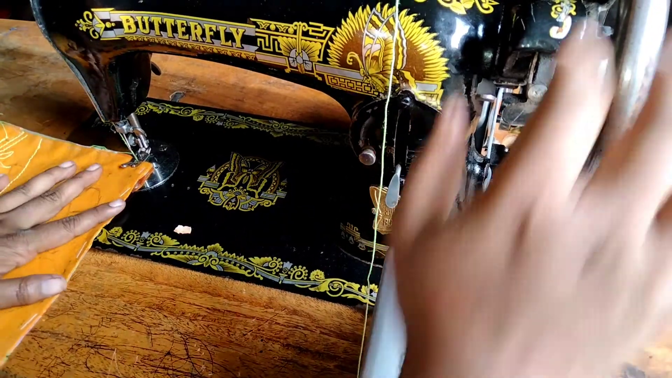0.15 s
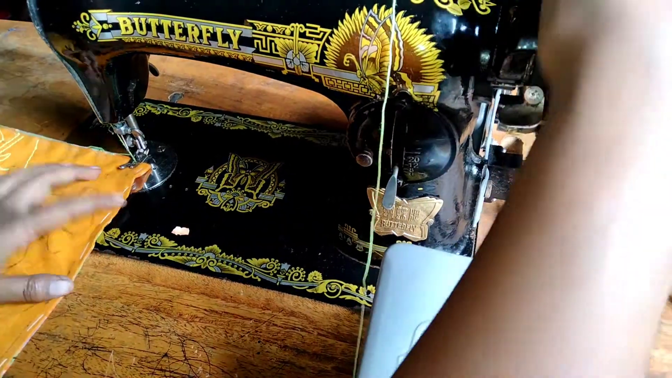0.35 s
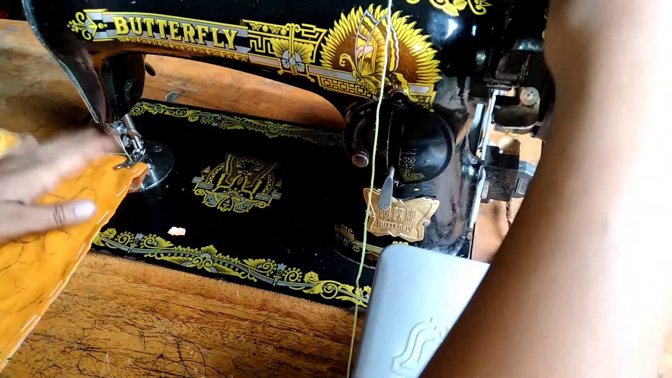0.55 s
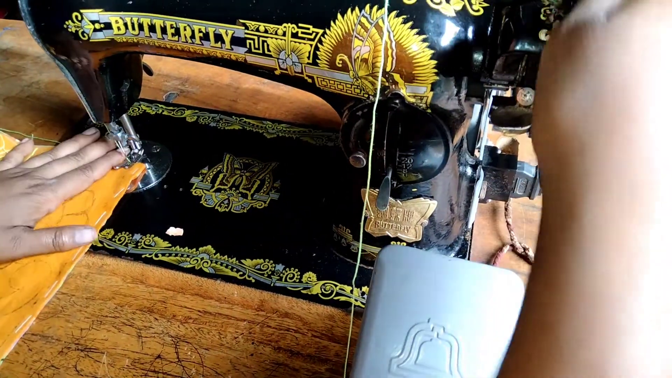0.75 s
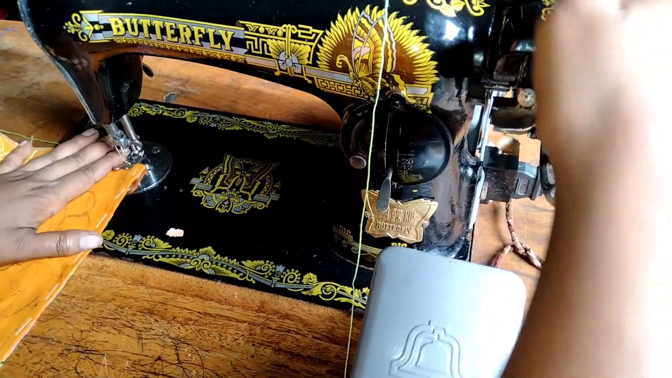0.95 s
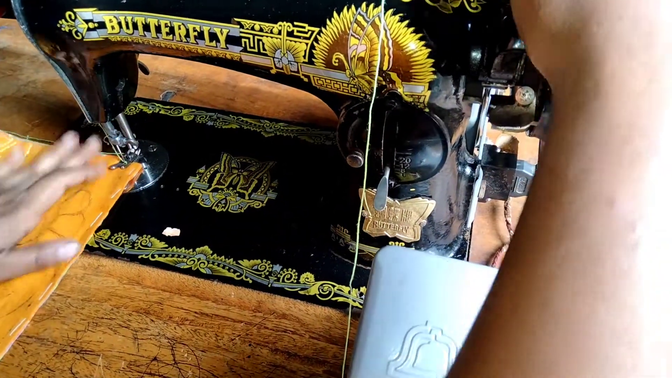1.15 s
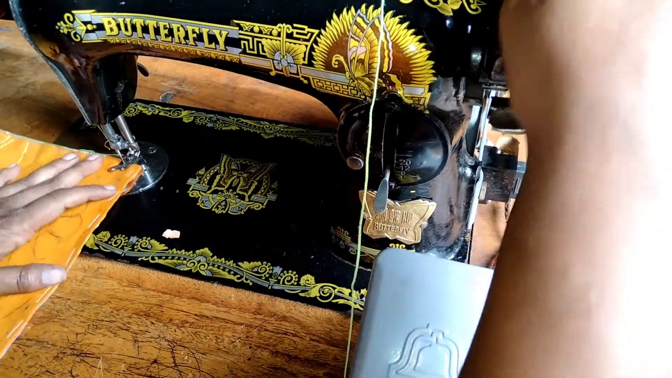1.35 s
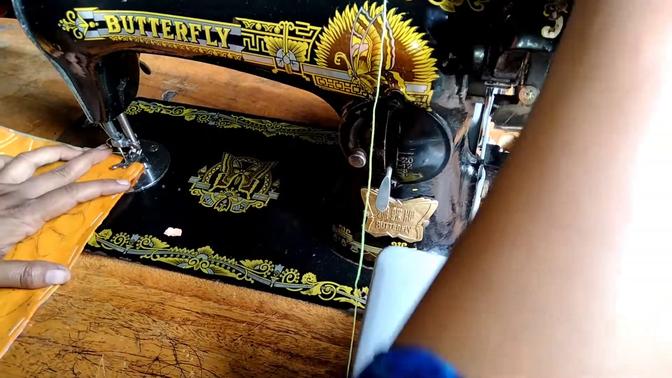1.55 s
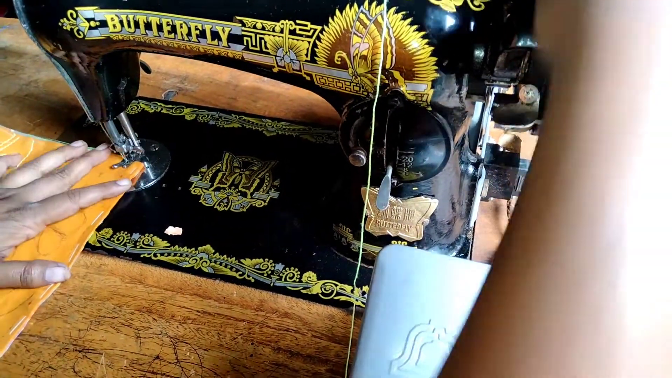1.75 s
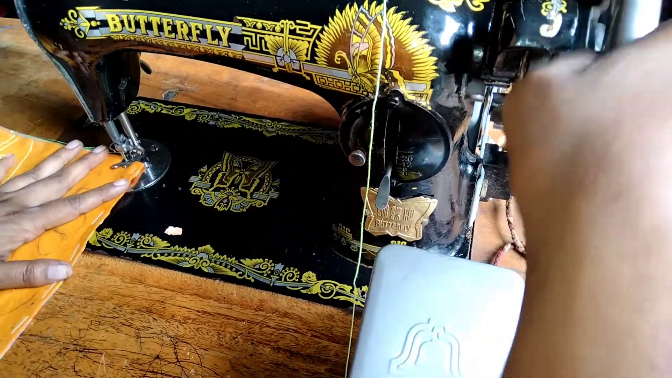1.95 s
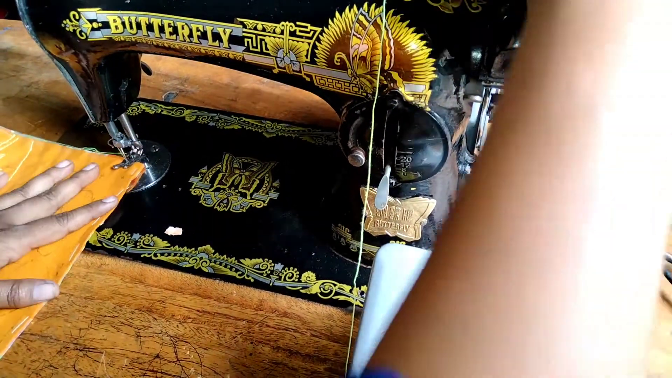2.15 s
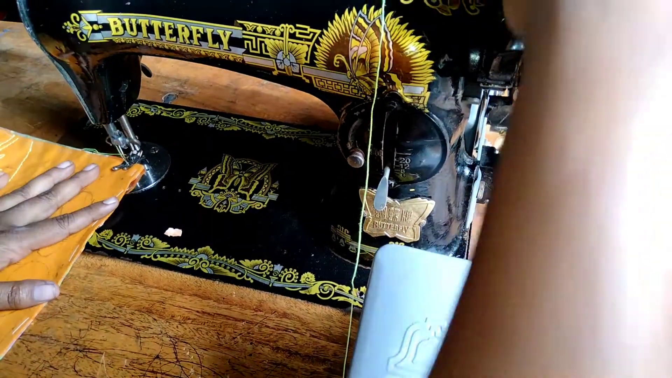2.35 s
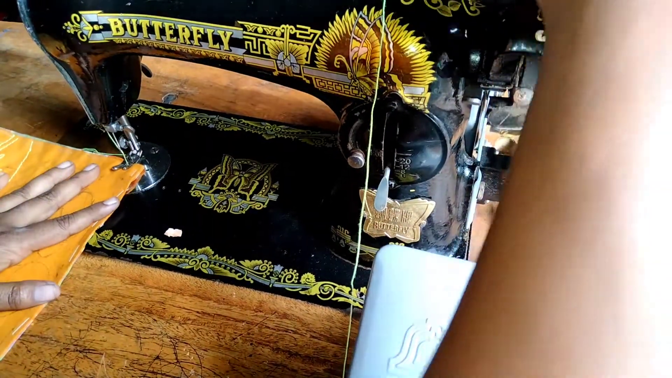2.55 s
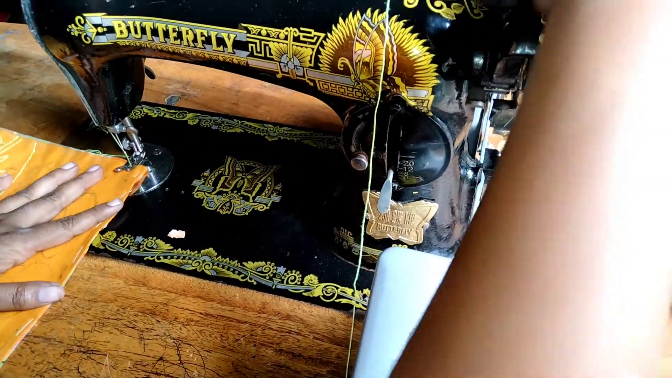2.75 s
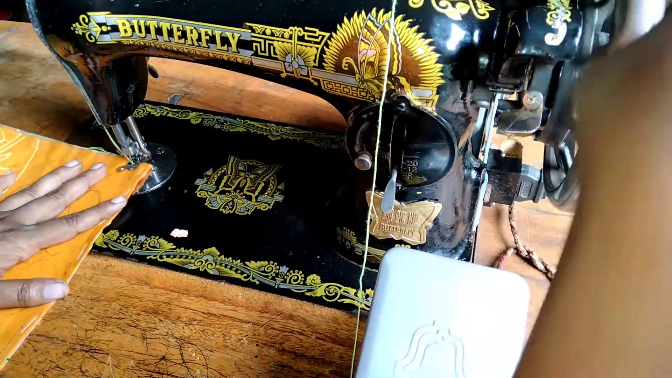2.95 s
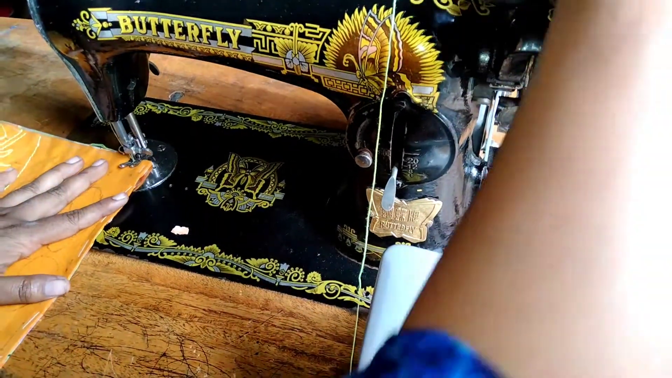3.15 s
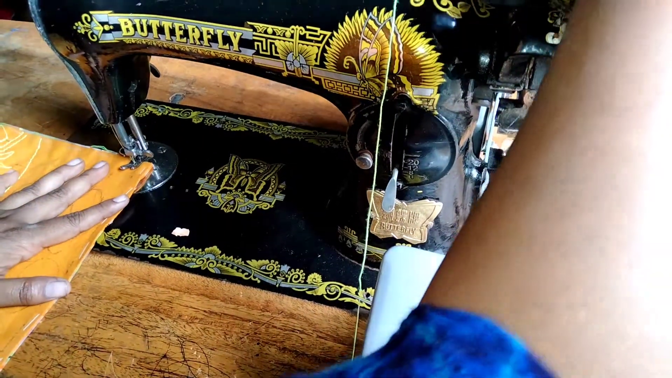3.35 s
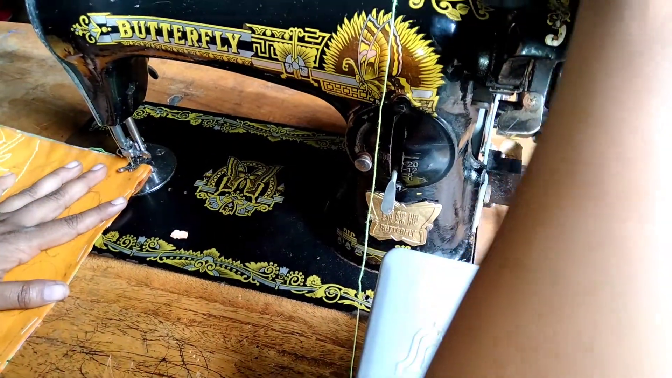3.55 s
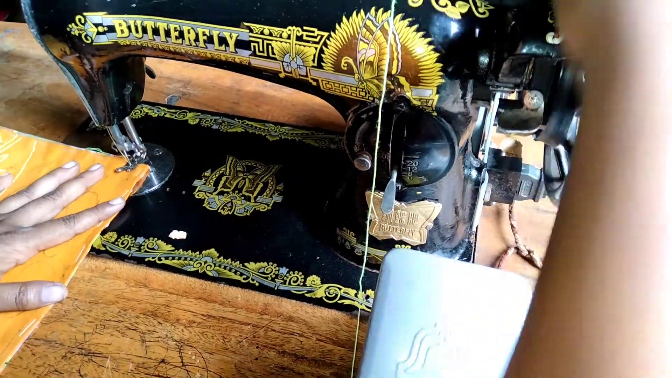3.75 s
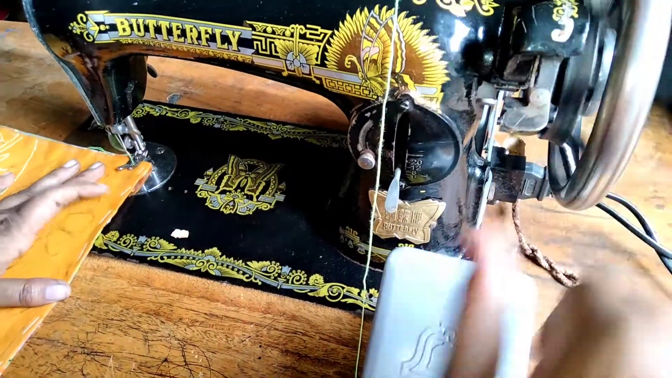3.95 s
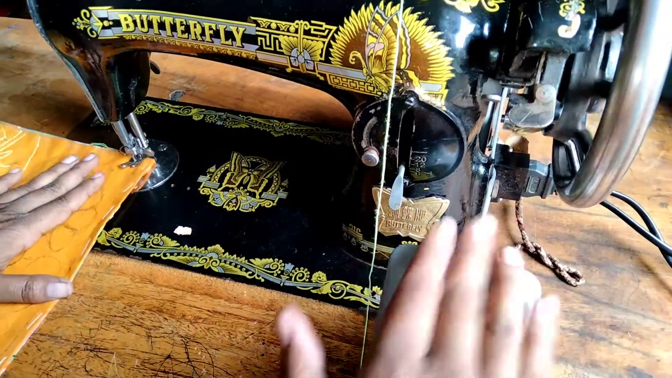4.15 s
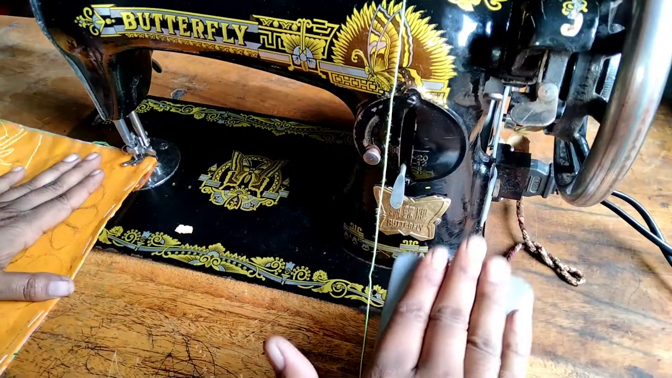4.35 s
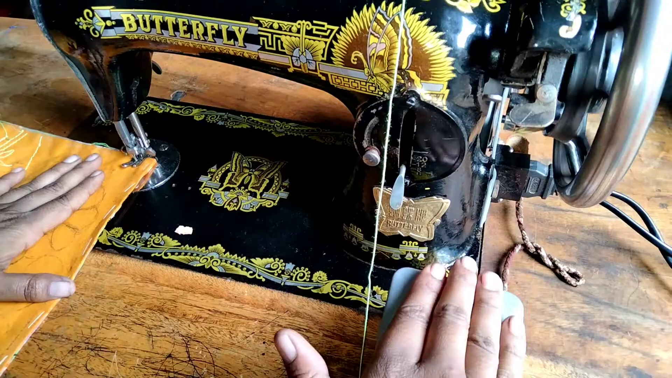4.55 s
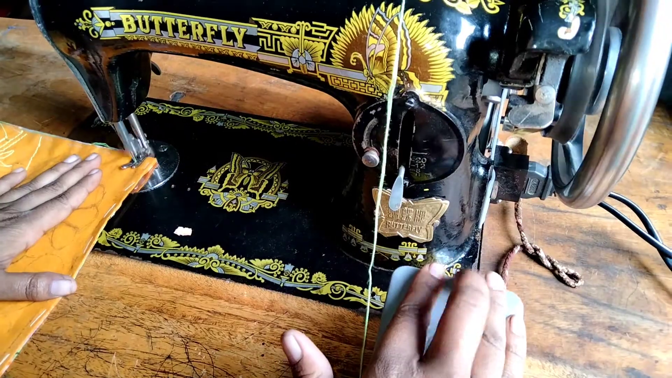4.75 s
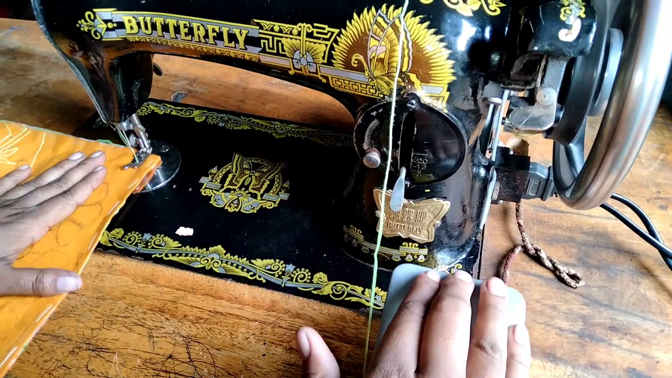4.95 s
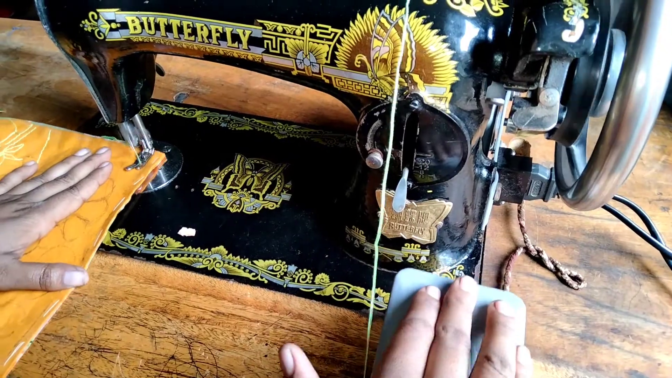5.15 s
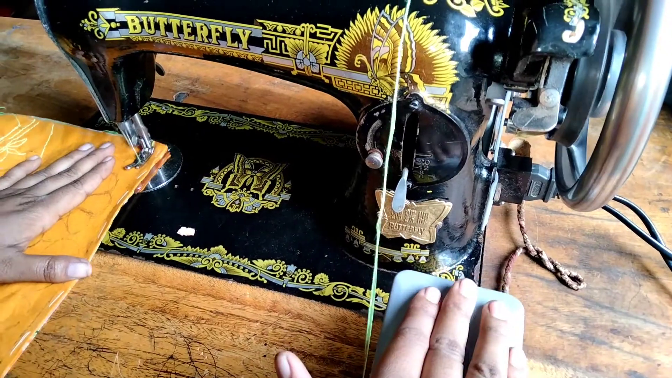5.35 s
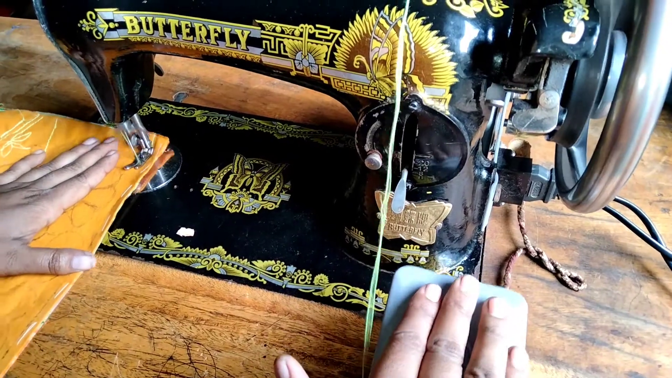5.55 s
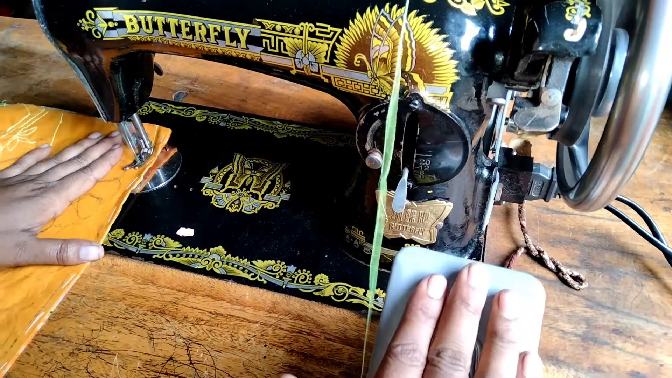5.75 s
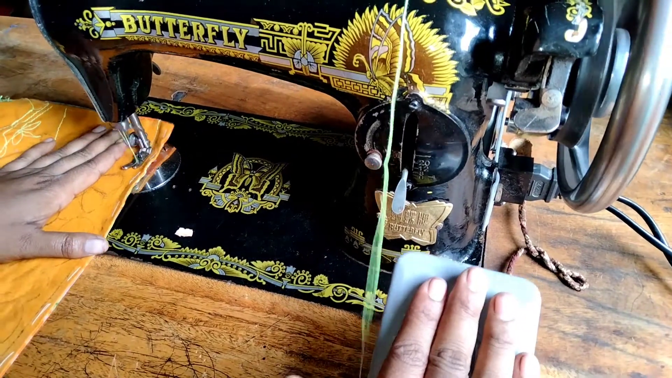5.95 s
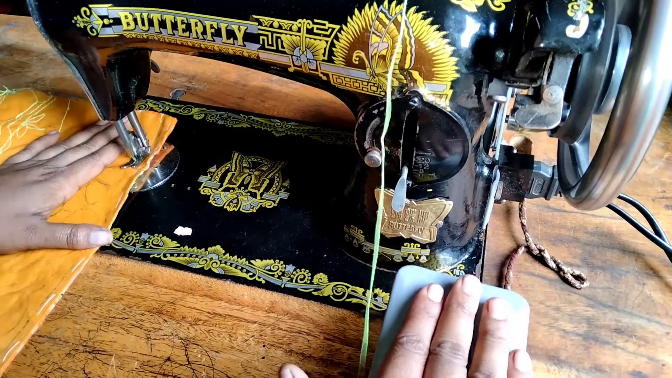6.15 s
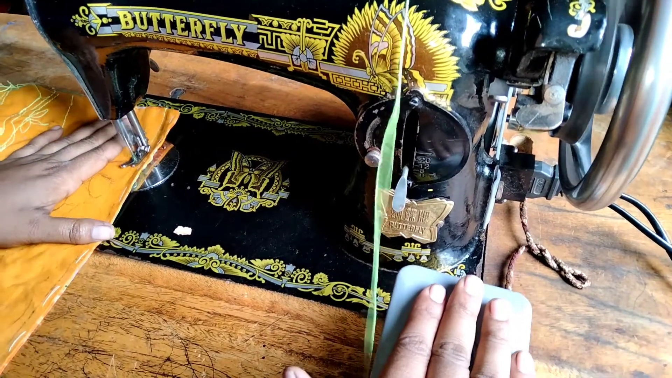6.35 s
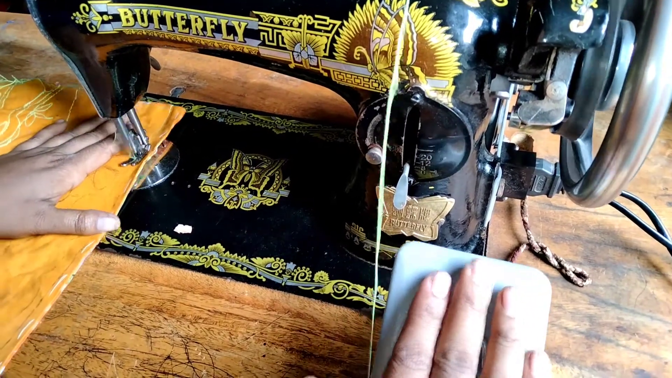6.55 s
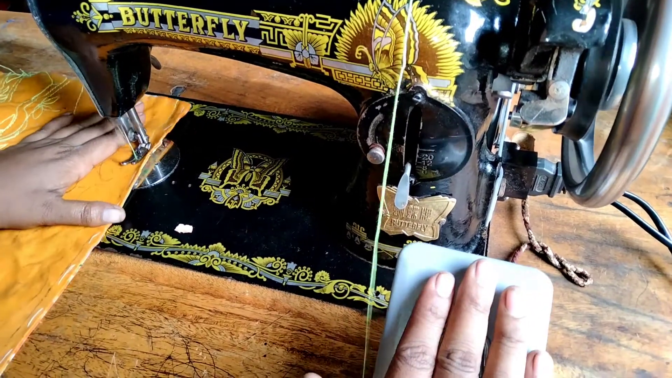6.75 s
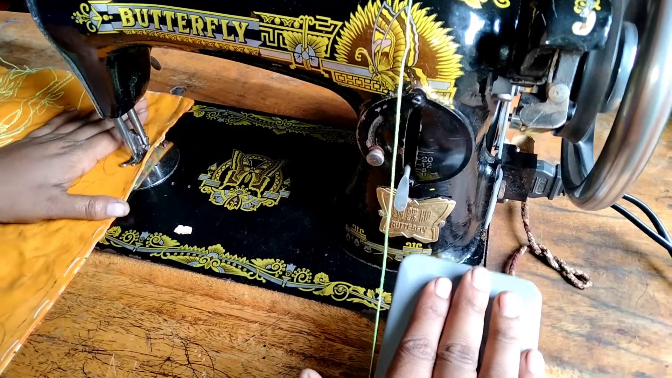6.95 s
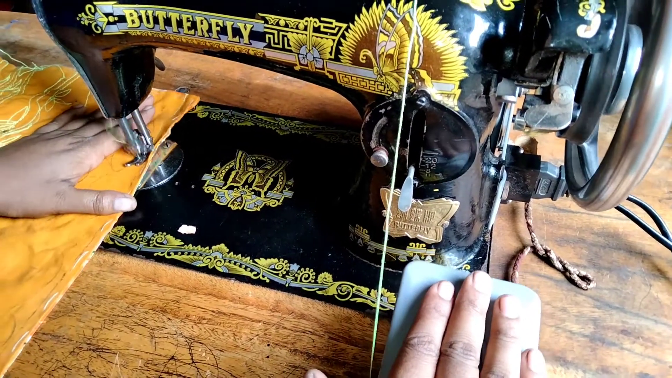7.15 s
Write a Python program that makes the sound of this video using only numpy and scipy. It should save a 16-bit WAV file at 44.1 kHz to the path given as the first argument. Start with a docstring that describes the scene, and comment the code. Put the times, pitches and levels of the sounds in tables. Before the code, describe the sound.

Soft handling near a sewing machine, one iron clank and dry clicks, then a small motor whirs up and loud, rapid stitching rattles on.

```python
"""Room hush and soft sliding cloth, then small knocks, rubs and faint squeaks under the hands, heard very close.
They turn the wheel of a cast-iron sewing machine on a wooden table, clank it on its stop and click a plastic pedal.
A small add-on motor whirs up, the belt takes hold, and the same round of strokes clatters for every stitch,
faster and slower. Hiss and tone stacks make cloth and motor; noise bursts and decaying modes make the blows."""
import sys
import numpy as np
from scipy import signal
from scipy.fft import rfft, irfft
from scipy.io import wavfile
from scipy.ndimage import uniform_filter1d

SR = 44100
rng = np.random.default_rng(int(sys.argv[2]) if len(sys.argv) > 2 else 0)


def pcm_store(signal):
    """Save signal as 16-bit PCM."""
    levels = np.round(np.clip(np.atleast_2d(signal), -1, 1) * 32767)
    wavfile.write(sys.argv[1], SR, levels.astype(np.int16).T)


N = 317520


def undb(db):
    """Decibels to gain."""
    return 10 ** (np.asarray(db) / 20)


def unit(x):
    """Scale to rms 1."""
    return x / np.sqrt(np.mean(x ** 2) + 1e-30)


def curves(table):
    """The columns of a table, joined by straight lines in time."""
    s, *columns = np.transpose(table)
    return [np.interp(np.arange(N) / SR, s, c) for c in columns]


def add(out, s, x):
    """Mix a sound in at a time."""
    i = max(int(s * SR), 0)
    out[i:i + len(x)] += x[:max(N - i, 0)]


def band(x, lo_hz, hi_hz, order=2):
    """Band-pass."""
    edges = [max(lo_hz, 10), min(hi_hz, SR / 2 - 100)]
    return signal.sosfilt(signal.butter(order, edges, "band", fs=SR, output="sos"), x + 1e-18)


def colour(x, points, resonances=(), size=8192):
    """Causal minimum-phase filter: a broad spectrum lifted at each resonance."""
    hz = np.arange(size // 2 + 1) * SR / size
    at, db = np.transpose(points)
    db = np.interp(np.log(hz + 1), np.log(at), db)
    for centre, width, lift in resonances:
        db = db + lift / (1 + (2 * (hz - centre) / width) ** 2)
    # folding the cepstrum makes the filter causal
    cepstrum = irfft(np.log(undb(db)))
    cepstrum[1:size // 2] *= 2
    cepstrum[size // 2 + 1:] = 0
    impulse = irfft(np.exp(rfft(cepstrum)))
    return signal.fftconvolve(x, impulse)[:len(x)]


def walk(rate):
    """Slow random drift of rms 1, with about this many new values per second."""
    k = max(int(SR / rate), 1)
    steps = np.repeat(rng.standard_normal(N // k + 1), k)
    return unit(uniform_filter1d(uniform_filter1d(steps, k), k)[:N])


def grit(spread_db, size):
    """Dense tiny contacts of very unequal strength."""
    return unit(rng.standard_normal(size) * undb(spread_db * rng.standard_normal(size)))


def mean_level(x, size=7000):
    """Rms over a couple of stitches."""
    power = uniform_filter1d(uniform_filter1d(x ** 2, size), size)
    return np.sqrt(np.abs(power) + 1e-5 * np.mean(x ** 2))


def shifting(x, points, resonances, shift=0.012, rate=14):
    """A colour whose resonances shift a little as the parts move."""
    def moved(factor):
        return colour(x, points, [(hz * factor, width, lift) for hz, width, lift in resonances])
    lower, upper = moved(1 - shift), moved(1 + shift)
    position = .5 + .5 * np.tanh(2 * walk(rate))
    return (1 - position) * lower + position * upper


ROOM_DB = -65  # rms
# colour of the quiet room: (frequency [Hz], relative level [dB])
ROOM_COLOUR = [(20, 1.5), (45, -2), (100, -8.5), (200, -12.5), (300, -16.5), (800, -26.5), (2000, -34),
               (6000, -43.5), (15500, -60)]


def room_hush():
    """Steady noise, heavy in the bass, stands for the air of the room."""
    return undb(ROOM_DB) * unit(colour(rng.standard_normal(N), ROOM_COLOUR))


RESTING_DB = -72  # cloth under the resting hand, relative level like the slides
# separate slides of hand and cloth: (start [s], length [s], relative level [dB])
SLIDES = [(0.145, 0.38, -66), (0.458, 0.13, -68.5), (1.11, 0.39, -68.5), (1.38, 0.39, -67.5),
          (1.84, 0.35, -66), (2.38, 0.37, -66), (2.783, 0.46, -57), (3.064, 0.49, -64), (3.832, 0.54, -57)]
# colour of the rustle, heard with a bright lift near 9 kHz: (frequency [Hz], relative level [dB])
RUSTLE_COLOUR = [(60, -39), (250, -1), (600, -11), (2000, -16.5), (4000, -15), (5500, -18), (7200, -11.5),
                 (9000, -0.5), (11000, -11.5), (15500, -14.5)]


def rustle(gain_db=1.0):
    """Cloth and skin slide over the bed of the machine; each slide swells and fades."""
    power = np.full(N, undb(RESTING_DB) ** 2)
    for s, length, db in SLIDES:
        add(power, s, (undb(db) * np.hanning(int(length * SR))) ** 2)
    fibres = unit(colour(grit(3, N), RUSTLE_COLOUR))
    return np.sqrt(power) * undb(gain_db) * fibres


# the hand rubs on wheel or pedal as it takes a new grip:
# (start [s], length [s], relative level [dB], note [Hz], width [Hz])
SCRAPES = [(0.172, 0.09, -60.5, 1100, 2200), (.795, 0.058, -64, 1700, 700), (1.372, 0.11, -59.5, 940, 1500),
           (2.595, 0.049, -57, 925, 300), (2.694, 0.09, -57, 1010, 900), (2.918, 0.11, -54.5, 1200, 1500),
           (3.023, 0.066, -58, 380, 160), (4.119, .17, -56.5, 340, 200)]


def scrapes(attack_share=0.28, grit_db=6, spot_db=9, skirt_db=-6):
    """The hand drags: a catching rub that swells, then fades, around one note of the rubbed part."""
    out = np.zeros(N)
    for s, length, db, hz, width_hz in SCRAPES:
        size = int(length * SR)
        swell = np.interp(np.linspace(0, 1, size), [0, attack_share, 1], [0, 1, 0]) ** 2
        skirts = [(100, skirt_db), (hz, 0), (4000, skirt_db), (7000, -30)]
        rub = colour(grit(grit_db, size), skirts, [(hz, width_hz, spot_db)])
        add(out, s, undb(db) * swell * unit(rub))
    return out


# thin squeaks under the hand, and one shrill high partial of the motor's whine at speed:
# (start [s], length [s], pitch [Hz], relative level [dB])
THIN_TONES = [(0.184, 0.11, 1460, -72), (0.23, 0.14, 1110, -77), (0.851, 0.14, 1404, -71),
              (1.384, 0.2, 2040, -71), (1.402, 0.4, 1710, -79), (1.476, 0.37, 794, -74),
              (1.78, .13, 1500, -77), (1.782, 0.16, 882, -73), (2.991, 0.053, 3410, -52.5),
              (3.822, 0.095, 1650, -73), (5.327, 0.44, 8080, -23.5)]


def thin_tones(gain_db=-2, waver=0.01, flutter_db=4):
    """Squeaks and the shrill whine partial are short, slightly unsteady sines that swell and fade."""
    out, unsteady = np.zeros(N), 1 + waver * walk(60)
    for s, length, hz, db in THIN_TONES:
        pitch = hz * unsteady[int(s * SR):int((s + length) * SR)]
        tone = np.sin(2 * np.pi * np.cumsum(pitch) / SR)
        add(out, s, undb(db + gain_db) * np.hanning(len(pitch)) * tone)
    return out * undb(flutter_db * walk(40))


# the cloth catches as it is lined up: (time [s], peak level [dB], note [Hz])
CLOTH_TICKS = [(.526, -54, 9110), (.5377, -47, 8800), (.554, -50, 8340), (.618, -54, 9910)]


def cloth_ticks(decay_s=0.0022, width_hz=1200, lift_db=10):
    """Tiny bright ticks as the cloth catches and slips free."""
    out, age = np.zeros(N), np.arange(SR // 20) / SR
    bright = [(500, -40), (9000, 10), (15500, -3)]
    for s, db, hz in CLOTH_TICKS:
        burst = rng.standard_normal(len(age)) * np.exp(-age / decay_s)
        tick = colour(burst, bright, [(hz, width_hz, lift_db)])
        add(out, s, undb(db) * tick / np.max(np.abs(tick)))
    return out


# broad colour of all blows and of the running machine, heard with a bright lift near 9 kHz: (frequency [Hz],
# relative level [dB])
BODY = [(20, -17), (40, -6.5), (100, -8), (300, -7), (650, -13), (800, -13.5), (1500, -12), (2300, -16.5),
        (4200, -15.5), (5800, -15.5), (7000, -8), (8800, 1), (11000, -8.5), (15500, -17.5)]


def knocks(blows, resonances, thud_ring=1.61, tick_ring=0.74):
    """Each blow thuds, clacks and ticks in the colour of body and spot; modes of the struck parts ring on."""
    age = np.arange(SR) / SR
    out = np.zeros(N)
    bands_hz = ((135, 1190), (1200, 6130), (6500, 15000))  # thud, clack, tick
    contacts = [band(grit(4, 2 * SR), lo, hi, order=4) for lo, hi in bands_hz]
    contacts = [c / np.std(colour(c, BODY, resonances)) for c in contacts]
    for s, contact_s, t60, thud_clack_tick, spot, modes in blows:
        rise = np.minimum(age / max(contact_s, 1e-4), 1)
        after = np.maximum(age - contact_s, 0)
        i = rng.integers(SR)
        burst = np.zeros(SR)
        for c, db, stretch in zip(contacts, thud_clack_tick, (thud_ring, 1, tick_ring)):
            burst += undb(db) * c[i:i + SR] * np.exp(-np.log(1000) * after / (t60 * stretch))
        add(out, s, colour(rise * burst, BODY, list(resonances) + spot))
        for hz, db, ring_s in modes:
            tone = np.sin(2 * np.pi * (hz * age + rng.random()))
            add(out, s, undb(db) * rise * np.exp(-np.log(1000) * after / ring_s) * tone)
    return out


def struck(modes, db):
    """A table of modes at the strength of one blow."""
    return [(hz, db + mode_db, t60) for hz, mode_db, t60 in modes]


PEDAL_S = 4.0  # from here on the hand is on the plastic pedal, no longer on the wheel
KNOCK_T60_S, CONTACT_SHARE = 0.15, 0.013  # ring of a middling knock; part of the ring time the contact lasts
# hard knocks die sooner, strong ones ring longer
MIDDLING_DB, HARDNESS_DB_PER_HALVING, FORCE_DB_PER_DOUBLING = -52, 13, 36
NOTE_CYCLES = 98  # the struck part dies away by 60 dB in this many cycles, so low notes hang on
# the hand knocks against wheel and frame, then lands on the pedal: (time [s], relative level [dB],
# hardness as tick over level [dB], note of the struck part [Hz], note over level [dB])
HAND_KNOCKS = [(0.755, -69.5, 3, 977, 5), (0.948, -62.5, 11, 1400, -7), (0.956, -59, 9, 4060, 7),
               (1.325, -61.5, 4, 4140, 0), (1.386, -59.5, 0.5, 560, -10), (1.412, -61, -9, 290, 1),
               (1.767, -56.5, -2, 582, 2), (1.955, -59.5, 16.5, 3840, -3), (2.081, -65.5, 0, 560, -9),
               (2.425, -55.5, 0.5, 343, 5.5), (2.426, -59, 7, 4060, 9), (2.594, -62, -2, 1820, 11),
               (2.602, -64.5, 4, 592, 11), (2.706, -60, 5, 1420, -2), (2.722, -54, 1.5, 1536, 3),
               (2.735, -60.5, -2, 226.5, 5.5), (2.839, -54.5, -0.5, 575, 1), (2.908, -54.5, 13.5, 770, 0),
               (2.937, -52.5, 1, 830, 5), (2.945, -53.5, 1, 1260, 1), (2.968, -51, -1, 1860, -1),
               (2.981, -59, -2, 597, 10), (3.021, -52, 3.5, 385, 3), (3.044, -60.5, 10, 353.6, 18),
               (3.192, -63, 4.5, 312, -5), (4.02, -56, -3, 563, 4.5), (4.041, -65, 18, 3420, -6),
               (4.055, -56, 14, 3470, 0), (4.082, -60, 16, 3500, 11), (4.098, -48.5, 14.5, 3350, -5),
               (4.117, -50.5, -1, 560, -1), (4.172, -52, 1, 345, 3.5), (4.208, -64.5, 15, 337, 14)]
# long rings of wheel and frame after a knock: (frequency [Hz], relative level [dB], t60 [s])
FRAME = [(635, 6, .24), (894, -6.5, .6), (2105, -22, 1.3), (2122, -4, .24), (2643, -5, .2), (3348, -9, .22),
         (3741, -2, .15), (4753, 5, .21), (7138, -2, .19), (7935, -12, .26)]
# the woody body of a knock on the table: (frequency [Hz], width [Hz], lift [dB])
WOOD = [(227, 18, 5.5), (278, 33, -3), (600, 140, 7.5), (874, 140, 5.5), (1250, 63, 1), (1810, 230, 8),
        (3600, 3100, 5.5)]


def hand_knocks(clack_db=-2, lean=0.24, frame_db=-11, soft_hz=1800, dull=2.4, spot_width=0.16, spot_db=5):
    """A harder knock is shorter and leans from thud to clack; until the pedal it also rings the frame's lows."""
    blows = []
    for s, db, hardness, note_hz, note_db in HAND_KNOCKS:
        doublings = (db - MIDDLING_DB) / FORCE_DB_PER_DOUBLING - hardness / HARDNESS_DB_PER_HALVING
        t60 = KNOCK_T60_S * 2 ** doublings
        thud, clack = db - lean * hardness, db + clack_db + lean * hardness
        modes = [(note_hz, db + note_db, NOTE_CYCLES / note_hz)]
        if s < PEDAL_S:
            for hz, mode_db, ring_s in struck(FRAME, thud + frame_db):
                modes.append((hz, mode_db - 20 * np.log10(1 + (hz / soft_hz) ** 2), ring_s))
        # a soft hand damps the treble
        spot = [(note_hz, spot_width * note_hz, spot_db), (4500, 3500, dull * min(hardness, 0))]
        blows.append((s, CONTACT_SHARE * t60, t60, (thud, clack, db + hardness), spot, modes))
    return knocks(blows, WOOD)


# the wheel touches its stop, clanks heavily and rebounds:
# (time [s], relative level [dB], hardness as tick over level [dB], t60 of the clack [s])
CLANKS = [(3.356, -52.5, 7, 0.058), (3.365, -36.5, -0.5, 0.2), (3.388, -53, -4, 0.066),
          (3.418, -56, -4, 0.084)]


def wheel_clanks(contact_share=0.022, thud_db=-4.5, frame_db=-11):
    """The heavy wheel meets its stop with a slow contact and sets the frame ringing."""
    blows = []
    for s, db, hardness, t60 in CLANKS:
        levels = (db + thud_db, db, db + hardness)
        blows.append((s, contact_share * t60, t60, levels, [], struck(FRAME, db + frame_db)))
    return knocks(blows, WOOD)


# the pedal clicks as it is pressed down: (time [s], relative level [dB],
# hardness as tick over level [dB], note of the spot that snaps [Hz], contact [ms])
PEDAL_CLICKS = [(4.297, -49, 2, 3300, 2.5), (4.316, -39, -14, 1540, 1.7), (4.32, -46.5, -2, 3360, 1.2),
                (4.373, -37.5, -14, 1160, 0.84), (4.376, -29, -3.5, 3400, 0.91), (4.41, -43, -9, 1600, 2.4),
                (4.451, -45.5, -1, 4940, 1.3), (4.465, -56, -3, 5000, 1), (4.476, -38.5, -12, 1080, 1.8),
                (4.48, -37, 1.5, 3470, 0.57), (4.488, -41, 3, 5470, 2), (4.5237, -28.5, 1.5, 4330, 0.3),
                (4.571, -42.5, 3.5, 5930, 1.8)]
# the plastic shell of the pedal: (frequency [Hz], width [Hz], lift [dB])
PEDAL_SHELL = [(1670, 820, 5.5), (3800, 670, 6.5), (5000, 2000, 4.5), (6840, 300, 7)]


def pedal_clicks(t60=0.051, thud_db=-13, clack_db=-6.0, spot_width=0.44, spot_db=11):
    """The light plastic pedal gives dry clicks with little thud, each coloured by the spot that snaps."""
    blows = []
    for s, db, hardness, hz, contact_ms in PEDAL_CLICKS:
        levels = (db + thud_db, db + clack_db, db + hardness)
        blows.append((s, contact_ms / 1000, t60, levels, [(hz, spot_width * hz, spot_db)], []))
    return knocks(blows, PEDAL_SHELL)


FULL_SPEED = 15  # stitches per second at which the clatter levels and the loaded whine hold
# the motor is switched on and runs up freely, until the belt grips and ties it to the shaft
MOTOR_ON_S, RUN_UP_S, FREE_HZ = 4.55, .1, 1265
GRIP_S, GRIPPED_S = 4.93, 5.5
LOADED_HZ, BELT_EXPONENT = 1003, .45  # whine at full speed; the slipping belt varies it less than the shaft
# main shaft, also drives the mechanism: (time [s], speed [stitches/s])
SPEED = [(4.8, 5.996), (5.03, 9.079), (5.2, 8.738), (5.71, 16.975), (6.02, 13.46), (6.21, 11.876),
         (6.59, 16.875), (7.0, 12.548), (7.2, 10.832)]


def motor_pitch():
    """The motor runs up freely, then the belt grips and drags it down to the pace of the shaft."""
    t = np.arange(N) / SR
    speed, = curves(SPEED)
    free_hz = FREE_HZ * (1 - np.exp(-np.maximum(t - MOTOR_ON_S, 0) / RUN_UP_S))
    loaded_hz = LOADED_HZ * (speed / FULL_SPEED) ** BELT_EXPONENT
    grip = np.interp(t, [GRIP_S, GRIPPED_S], [0, 1])
    return (1 - grip) * free_hz + grip * loaded_hz


WHINE_DB, FULL_DRIVE_DB = -51, -36  # reference partial at full pitch; the whine fades at throttle below this
SEGMENTS, UNEVEN = 6, .35  # unevenly spaced contacts split the whine (count per turn, radians)
# how hard the pedal drives the motor: (time [s], hiss of brushes and belt [dB])
THROTTLE = [(4.56, -59), (4.63, -39), (4.68, -32), (4.85, -27.5), (5.03, -31), (5.13, -50), (5.34, -27),
            (5.64, -35), (6.2, -33), (6.58, -21), (7.2, -67)]
# partials of the whine, from the lowest up: (relative level [dB])
WHINE_PARTIALS = [0, -11, -3, -8, -12, -9, -5, 1, 2, -1, -4, -9]
# colour of the brush hiss: (frequency [Hz], relative level [dB])
MOTOR_COLOUR = [(30, -16), (100, -9), (300, -15.5), (1000, -20), (1600, -21), (2800, -17), (5600, -14),
                (7000, -0.5), (8600, 6.5), (10000, 1), (12000, -5), (15500, -9.5)]
# resonances of the motor housing: (frequency [Hz], width [Hz], lift [dB])
HOUSING = [(313, 34, 6), (2690, 150, 9), (4080, 150, 20.5), (4760, 290, 12.5), (7160, 330, -9),
           (8200, 270, 0), (8940, 190, 2.5), (9940, 120, 9), (10900, 560, 2.5), (11900, 500, -6),
           (13400, 600, 9)]


def motor(spark=0.18, mains=0.21, rough=0.81, drive_share=0.7):
    """Brushes hiss on the commutator, whose segments also give a rough whine that throbs with the mains."""
    hz = motor_pitch()
    hiss_db, = curves(THROTTLE)
    phase = 2 * np.pi * np.cumsum(hz * (1 + .012 * walk(300))) / SR
    phase = phase + UNEVEN * np.sin(phase / SEGMENTS)
    hum = 1 + mains * np.sin(2 * np.pi * 100 * np.arange(N) / SR)
    throb = hum * undb(3.5 * walk(90))
    # every passing segment makes the brushes spark a little
    brushes = grit(4.0, N) * (1 + spark * np.cos(phase)) * (hz > 0)
    hiss = shifting(brushes, MOTOR_COLOUR, HOUSING, shift=0.0076, rate=13)
    whine = np.zeros(N)
    for k, db in enumerate(WHINE_PARTIALS, 1):
        # the chattering brushes smear every partial in its own way
        whine += undb(db) * np.sin(k * phase + rough * walk(250))
    drive = undb(drive_share * np.minimum(hiss_db - FULL_DRIVE_DB, 0))
    whine_level = undb(WHINE_DB) * (hz / LOADED_HZ) ** 2 * drive
    return undb(hiss_db) * hiss / np.std(hiss[hz > 0]) + whine_level * throb * whine


RING_SCATTER_DB, MODE_SPREAD = 1.8, .02  # a part's ring varies by stroke in level [dB] and pitch [share]


def cluster(hz, width_hz, age, rise_s=0.0011, count=3):
    """A few close modes of one part, struck in a new mixture every time."""
    detune, weight, start = rng.standard_normal((3, count, 1))
    tones = np.sin(2 * np.pi * (hz * (1 + MODE_SPREAD * detune) * age + start))
    modes = np.sum(weight * tones, axis=0)
    return unit(modes * (1 - np.exp(-age / rise_s)) * np.exp(-np.pi * width_hz * age))


CLATTER_DB, CLATTER_DB_PER_DOUBLING = -27.5, 15.5  # below the split
STEEL_DB, STEEL_DB_PER_DOUBLING = -20, 10.5  # treble of the strokes
TAKE_UP_S = 0.043  # the belt takes up the load, so the first strokes are soft
# strokes of one stitch: (shaft angle [turns], rattle [ms], rattle relative level [dB], hardness as treble
# over rattle [dB], ring [Hz], ring width [Hz], ring relative level [dB], speed effect [dB per doubling])
STROKES = [(.08, 6, -12, -6, 325, 30, -18, 4), (.17, 6, -4, 2, 9000, 300, -6, -4),
           (.185, 5, -4, 0, 1450, 170, -.5, 8), (.19, 4, -12, 0, 4120, 110, -.5, 2),
           (.245, 7, -7, -2, 600, 120, -5.5, -4), (.285, 5, -5, -1, 4300, 140, -1, 2),
           (.37, 5, 0, 0, 4000, 500, -3, 4), (.395, 6, -7, 0, 3400, 100, -2.5, 2),
           (.455, 4.9, -3, 0, 539, 130, -9, -4), (0.53, 2.5, -10.5, 0, 145, 50, -13, 0),
           (.65, 8, -2, -11, 1440, 220, -1.5, 8), (.7, 4, -12, 0, 5020, 100, -1.5, -2),
           (.712, 2.6, -5, 7, 9500, 170, -2.5, 0), (.715, 3, -9, 0, 12400, 170, 1, 0),
           (.765, 7, -5, -3, 760, 250, -11, 4), (.87, 5, -5, 1, 6020, 170, -6, 1),
           (.895, 5, -6, 4, 7700, 200, -5, 4), (.91, 5, -7, 5, 5040, 80, 3, 0),
           (.955, 5, -1, -3, 4000, 400, -2.5, 12)]
# resonances of table and casting: (frequency [Hz], width [Hz], lift [dB])
RESONANCES = [(97, 16, 6), (149.5, 19.4, 13), (192, 21, 4), (230.3, 26, 10.5), (328, 50, 12.5),
              (444, 54, 8), (585, 115, 9), (669, 47, 9.5), (953, 420, 12), (1153, 15, -8), (1656, 490, 4),
              (1976, 230, 6.5), (2550, 55, 10), (3243, 120, 7), (3550, 92, 1), (3934, 350, 2.5),
              (4780, 140, 8.5), (7400, 230, -1), (9950, 52, 1), (13500, 360, 4)]


def mechanism(scatter_db=2.0, jitter_s=.0005, grit_db=4.0, alike=0.29, slide_db=-23, tail_s=0.17,
              tail_db=-12.5, ring_db=-4, split_hz=2500, steel_speed=13):
    """Needle bar, take-up lever, shuttle and feed hit their play at fixed shaft angles; the faster, the louder."""
    t = np.arange(N) / SR
    running = t >= SPEED[0][0]
    speed, = curves(SPEED)
    turns = np.cumsum(speed * running) / SR
    age = np.arange(2048) / SR
    doublings = np.log2(speed / FULL_SPEED)
    low = undb(slide_db) * grit(grit_db, N) * running
    high = low.copy()
    for angle, rattle_ms, rattle_db, hardness, hz, width_hz, peak_db, speed_db in STROKES:
        # a hard first contact, a short rattle, then the dense ringing of the casting
        shape = np.exp(-age / 0.000043) + np.exp(-age * 1000 / rattle_ms) + undb(tail_db) * np.exp(-age / tail_s)
        shape = shape * np.minimum(4 * (1 - age / age[-1]), 1)
        own = band(grit(grit_db, len(age)), 320, 10300)  # this part of the rattle is the same on every turn
        for i in np.searchsorted(turns, np.arange(angle, turns[-1])):
            late, strong, ringing = rng.standard_normal(3)
            force = undb(scatter_db * strong + speed_db * doublings[i])
            rattle = shape * (np.sqrt(alike) * own + np.sqrt(1 - alike) * grit(grit_db, len(age)))
            # the part that is hit rings at its own note
            ring = np.std(shape) * undb(RING_SCATTER_DB * ringing) * cluster(hz, width_hz, age)
            for out, db in ((low, rattle_db), (high, rattle_db + hardness)):
                add(out, t[i] + jitter_s * late, force * (undb(db) * rattle + undb(peak_db + ring_db) * ring))
    low = band(shifting(low, BODY, RESONANCES), 7.4, split_hz, order=4)
    high = band(shifting(high, BODY, RESONANCES), split_hz, SR / 2, order=4)
    clatter_gain = undb(CLATTER_DB + CLATTER_DB_PER_DOUBLING * doublings)
    # the sharp steel ticks only come up with speed
    steel_gain = np.clip(speed / steel_speed, 0, 1) * undb(STEEL_DB + STEEL_DB_PER_DOUBLING * doublings)
    load = np.sqrt(np.clip((t - SPEED[0][0]) / TAKE_UP_S, 0, 1))
    return load * (clatter_gain * low / mean_level(low) + steel_gain * high / mean_level(high))


# single knocks of the running mechanism, soft as it starts, many of them strong at speed:
# (time [s], relative level [dB], hardness as tick over level [dB])
CLACKS = [(4.807, -39, -4), (4.874, -41, 0), (4.974, -43, 20), (5.084, -38, 14.5), (5.112, -43.5, 17),
          (5.199, -40, 15.5), (5.347, -38, 16), (5.407, -39, 23), (5.52, -35, -3), (5.59, -33, 18),
          (5.716, -35, 22), (5.871, -20, -11), (5.906, -19.5, 4), (5.96, -23, 10), (6.011, -25, 14),
          (6.051, -22, 7.5), (6.435, -18.5, 1), (6.59, -21.5, 2), (6.714, -19.5, -8), (6.777, -15.5, 2),
          (6.835, -26.5, 14), (6.846, -17.5, 6), (6.886, -29, 18), (6.918, -19.5, 5), (7.024, -19.5, 6),
          (7.145, -22, 8), (7.18, -32, 12)]
# what these clacks ring with: (frequency [Hz], width [Hz], lift [dB])
CASTING = [(570, 35, 14.5), (1400, 410, 8), (4370, 1400, 9)]


def clacks(contact_s=0.00091, t60=0.031, thud_db=-9):
    """Steel on steel in the running machine: very short contacts in the colour of the casting."""
    blows = [(s, contact_s, t60, (db + thud_db, db, db + hardness), [], []) for s, db, hardness in CLACKS]
    return knocks(blows, CASTING)


def casting(x, share=0.16):
    """The many close modes of the iron smear each blow over a few milliseconds and make the treble ring."""
    age = np.arange(1024) / SR
    modes = band(rng.standard_normal(len(age)), 3500, 21000) * np.exp(-age / .006)
    ringing = signal.fftconvolve(x, modes / np.sqrt(np.sum(modes ** 2)))[:N]
    treble = signal.sosfiltfilt(signal.butter(2, 3500, "high", fs=SR, output="sos"), x)
    return x - treble + np.sqrt(1 - share) * treble + np.sqrt(share) * ringing


def walls(x, t60=0.27, wet_db=-15, dull_hz=6000):
    """A small furnished room gives a short, dull tail."""
    age = np.arange(SR // 2) / SR
    noise = band(rng.standard_normal(len(age)), 89, dull_hz, order=1)
    tail = noise * np.exp(-np.log(1000) * age / t60) * (age > .006)
    return x + undb(wet_db) * signal.fftconvolve(x, tail / np.sqrt(np.sum(tail ** 2)))[:N]


def scene():
    """Machine, motor and hands over the hush of the room."""
    blows = hand_knocks() + wheel_clanks() + pedal_clicks() + clacks()
    machine = casting(mechanism() + blows) + motor() + thin_tones() + scrapes()
    return (walls(machine) + rustle() + cloth_ticks() + room_hush())[None]


TOP_HZ = 15700


def record(dry):
    """Soft saturation rounds the highest peaks, then a steep low-pass cuts the top."""
    rounded = dry / (1 + (dry / .92) ** 4) ** .25
    return signal.sosfilt(signal.ellip(10, .2, 80, TOP_HZ, fs=SR, output="sos"), rounded)


dry = scene()
out = record(dry)
pcm_store(out)
```